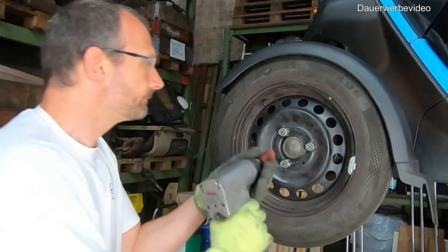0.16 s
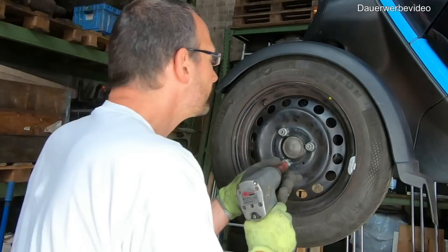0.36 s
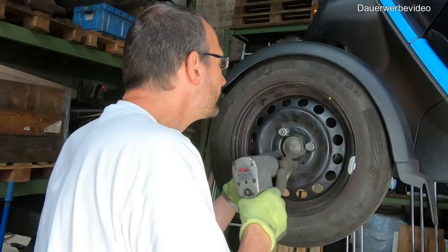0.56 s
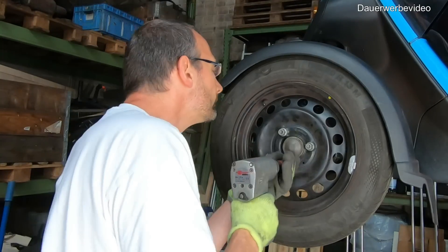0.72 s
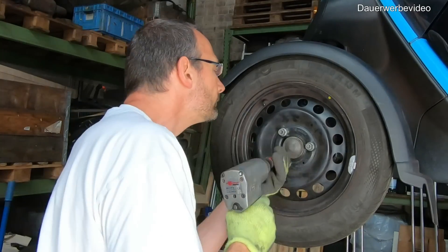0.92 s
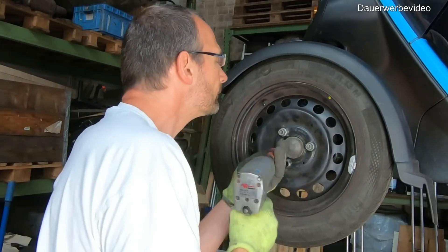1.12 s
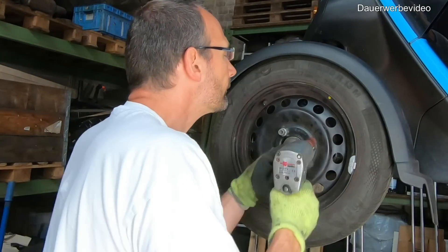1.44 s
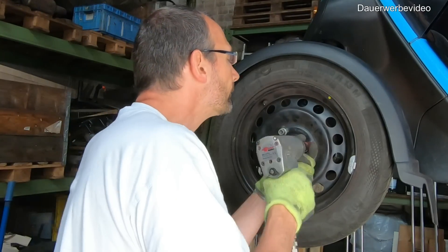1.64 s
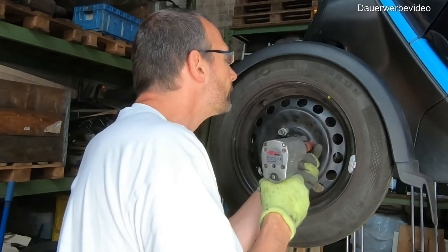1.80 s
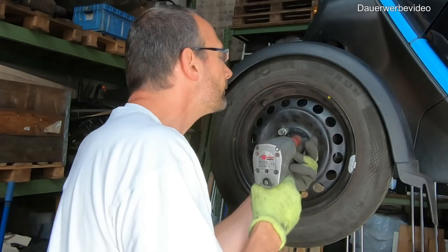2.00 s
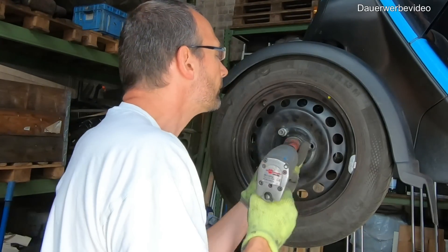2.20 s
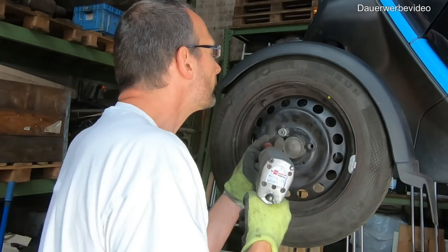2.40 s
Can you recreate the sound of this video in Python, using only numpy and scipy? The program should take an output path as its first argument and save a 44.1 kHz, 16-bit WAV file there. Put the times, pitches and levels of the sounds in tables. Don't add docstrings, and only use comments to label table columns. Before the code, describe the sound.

An impact wrench fires two short, clattering bursts on steel wheel bolts, each whining down afterward; socket knocks and small clicks come before each, close microphone, hard ringing garage.

```python
import sys
import numpy as np
from scipy import signal
from scipy.fft import rfft, irfft
from scipy.io import wavfile
from scipy.ndimage import uniform_filter1d

SR = 44100
rng = np.random.default_rng(int(sys.argv[2]) if len(sys.argv) > 2 else 0)


def log_audio(samples):
    frames = np.atleast_2d(samples).T
    limited = np.clip(frames, -1, 1)
    pcm = np.round(limited * 32767).astype(np.int16)
    wavfile.write(sys.argv[1], SR, pcm)


def level_to_linear(level):
    exponent = np.asarray(level, float) / 20
    return 10 ** exponent


N = 112454


def evened(x):
    return x / np.sqrt(np.mean(x ** 2) + 1e-20)


def add(mix, s, sound):
    part = mix[round(s * SR):][:len(sound)]
    part += sound[:len(part)]


def noise(points, count=N):
    f, db = np.transpose(points)
    hz = np.fft.rfftfreq(count, 1 / SR)
    gain = level_to_linear(np.interp(np.log(hz + 1), np.log(f), db))
    return evened(irfft(rfft(rng.standard_normal(count)) * gain, count))


def resonate(x, hz, width):
    return signal.lfilter(*signal.iirpeak(min(hz, .45 * SR), hz / width, SR), x)


def ring(modes, t, hz, focus_db):
    f, db, t60 = np.transpose(modes)[:, :, None]
    level_luck, tune_luck = rng.random((2, len(modes), 1))
    db = db - focus_db * abs(np.log2(f / hz)) + 8 * (level_luck - .5)
    tuned = f * (1 + 0.057 * (tune_luck - .5))
    return (level_to_linear(db - 60 * t / t60) * np.sin(2 * np.pi * tuned * t)).sum(0)


def thud(t, hz):
    u = 3.23 * hz * t
    return -np.sin(2 * np.pi * hz * t) * u * u * np.exp(2 - 2 * u)


def blow_load(t):
    load = 0
    for row in BLOWS:
        hold = np.clip((t - row[0]) / 0.00277, 0, 1)
        load = load + hold * np.exp(-np.maximum(t - row[0], 0) / .011)
    return load


TOP_HZ, STALL_HZ = 1213, 228.4
SAG_DB = -4
# (pull [s], rotor free [s], spin-up [s], release [s], coast [s], air [dB])
TRIGGER = [
    (0.68, 0.698, .1, .903, .0735, -21),
    (1.752, 1.799, .068, 1.924, .085, -26),
]
# (frequency [Hz], level [dB])
DRIVEN_TONE = [(230, -23.5), (420, -18), (700, -21), (900, -28), (1130, -39)]
# (frequency [Hz], level [dB])
COAST_TONE = [(110, -82), (190, -49.5), (300, -33.5), (400, -28), (490, -29), (620, -21), (820, -24.5),
              (1000, -32.5)]
DRIVEN_HARMONICS = [-39, -60, -44, -58, -52, -56, -60, -60, -60, -60]
COAST_HARMONICS = [-33, -37, -34.5, -37.5, -41, -39, -46, -42, -45, -50]
# (frequency [Hz], width [Hz], gain [dB])
HOUSING = [(2720, 170, 9.5), (1900, 2500, 0.5)]
# (frequency [Hz], level [dB per Hz])
EXHAUST = [(100, -2.5), (600, -19), (1500, -19), (4000, -5.5), (9000, -15.5), (16000, -9)]


def motor(pull, free, spin_s, release, coast_s, air_db):
    t = np.arange(N) / SR
    since, after = np.maximum(t - pull, 0), np.maximum(t - release, 0)
    coast = np.clip(after / 0.004, 0, 1)
    load = blow_load(t)
    gust = 3.5 * evened(uniform_filter1d(rng.standard_normal(N), 200))

    driven_hz = np.maximum(TOP_HZ * np.tanh((t - free) / spin_s) * (1 - .07 * load), STALL_HZ)
    idle_hz, release_hz = 80.2, 1007
    coast_hz = idle_hz + (release_hz - idle_hz) * np.exp(-(after / coast_s) ** 1.26)
    speed = driven_hz * (1 - coast) + coast * coast_hz
    wobble = 0.0126 + 0.3002 * np.exp(-since / 0.04116)
    jitter = evened(uniform_filter1d(rng.standard_normal(N), 150))
    turns = np.cumsum(speed * (1 + wobble * jitter)) / SR

    driven_level = level_to_linear(np.interp(speed, *np.transpose(DRIVEN_TONE)) + SAG_DB * load)
    coast_level = level_to_linear(np.interp(speed, *np.transpose(COAST_TONE)))
    tone = driven_level * (1 - coast) + coast_level * coast
    tone *= level_to_linear((1.15 - coast) * gust) * np.cos(2 * np.pi * turns)

    k = np.arange(len(COAST_HARMONICS))[:, None] + 2
    driven_fade = (1 - coast) * level_to_linear(SAG_DB * load) * (speed / TOP_HZ) ** 2
    coast_fade = coast * level_to_linear(-146 * after)
    sizes = np.outer(level_to_linear(DRIVEN_HARMONICS), driven_fade) + np.outer(level_to_linear(COAST_HARMONICS), coast_fade)
    flutter = evened(uniform_filter1d(rng.standard_normal(sizes.shape), 400))
    sizes *= level_to_linear((5.0 - 2.7 * coast) * flutter - 5.4 * coast * (k * speed > 3150))
    upper = (sizes * np.cos(2 * np.pi * k * turns + k * k)).sum(0)
    upper += sum(level_to_linear(gain) * resonate(upper, hz, width) for hz, width, gain in HOUSING)
    whine = 2 ** .5 * (tone + upper)

    raw = rng.standard_normal(N)
    chug = level_to_linear(-13.5 + gust - 60 * since / 0.32) * evened(resonate(resonate(raw, 385, 800), 385, 800))
    rush_db = 21.5 * np.exp(-since / 0.015) - 70 * since - 60 * after / 0.083
    air = level_to_linear(air_db - 3 + 4.0 * np.minimum(load, 1) + gust + rush_db) * noise(EXHAUST)
    return np.clip(since / 0.02, 0, 1) * (whine + chug + air)


# (frequency [Hz], level [dB], t60 [s])
ANVIL = [(3000, -8, 0.012), (5120, -19, 0.021), (6027, -10.5, 0.03), (8970, -5, 0.0074),
         (11100, -12.5, 0.036), (13150, -14, 0.0088), (15160, -19.5, 0.023)]
# (time [s], peak [dB], loudest ring [Hz], thump [dB])
BLOWS = [(0.6945, -6, 9300, -28), (0.701, 1, 11100, -7), (0.7242, 7.5, 9600, -11), (0.7418, 4, 9000, -10),
         (0.7548, 2, 7500, -5), (0.778, -10, 8800, -36), (0.7986, -1.5, 3220, -12.5),
         (0.8214, -3.5, 15000, -24), (0.844, -7.5, 8600, -49), (0.87, -12.5, 15500, -20.5),
         (0.9019, -11, 2930, -41), (1.7582, -1.5, 5840, -34.5), (1.7731, 8.5, 10400, -17),
         (1.7967, 6, 6900, -10), (1.8145, 2, 6900, -19), (1.8274, 2, 6550, -4), (1.8452, -4, 14900, -18.5),
         (1.8699, -6.5, 15500, -23), (1.8929, -9, 5150, -36), (1.9183, -10.5, 2900, -60)]


def blow(s, db, hz, thump_db):
    t = np.arange(0, .08, 1 / SR)
    burst = level_to_linear(-60 * np.maximum(t - .0025, 0) / 0.01)
    tail = level_to_linear(-35.0 - 60 * t / 0.086)
    raw = rng.standard_normal(len(t))
    grit = 0.31 * raw + 0.15 * np.diff(raw, prepend=0) + 0.25 * evened(resonate(raw, hz, 1700))
    crash = np.minimum(t / 0.0009, 1) * (burst + tail) * grit
    steel = level_to_linear(db - 5) * (crash + 1.46 * ring(ANVIL, t, hz, focus_db=9.5))
    return s + .001, steel + level_to_linear(thump_db - 9.5) * thud(t, 115.0)


# (time [s], level [dB])
KICKS = [
    (.6905, -11.5),
    (.712, -4),
    (1.769, -16),
    (1.785, 0),
]


def kick(s, db):
    return s, -level_to_linear(db) * thud(np.arange(0, .03, 1 / SR), 338)


# (frequency [Hz], level [dB], t60 [s])
RIM = [(841, -9.5, 0.049), (985, -5, 0.037), (1124, -3, 0.038), (1341, 0, 0.037), (1434, 0.5, 0.026),
       (1656, -13.5, 0.043), (2150, -10, 0.052), (2393, -10.5, 0.043), (2993, 0.5, 0.028),
       (3075, -6.5, 0.027), (3274, 1.5, 0.018), (4220, -4.5, 0.026), (5480, -6, 0.024), (6230, -5, 0.032),
       (9300, 2.5, 0.012)]
# (time [s], peak [dB], loudest ring [Hz], focus [dB per octave], rise [s])
KNOCKS = [(.385, 1, 3070, 4, 0.00053), (.406, -16, 3000, 14, 0.0018), (.421, -9.5, 1360, 19, .002),
          (.438, -3, 5000, 4.5, 0.00053), (.439, -15, 1350, 12, .001), (.499, -4.5, 1330, 6, 0.00078),
          (.508, -9, 1500, 5.5, 0.0017), (.520, -14, 1000, 3.5, .002), (.531, -12, 3100, 18, 0.0031),
          (.544, -20, 1400, -1, 0.0022), (.547, -12.5, 6230, 12.5, 0.0025), (.630, -1.5, 1450, 11, 0.0024),
          (1.412, -29.5, 1310, 2.5, 0.0015), (1.497, -38, 3530, -1, 0.0016), (1.6245, -5, 2260, 10, 0.0005),
          (1.6255, -10, 1020, 7, 0.00094), (1.634, -11, 950, 22, 0.0011), (1.647, -10, 850, 15.5, 0.0011),
          (1.714, -20, 850, 13, 0.0024), (1.720, -12.5, 900, 12, 0.0017)]


def knock(s, db, hz, focus_db, rise_s):
    t = np.arange(0, .25, 1 / SR)
    raw = rng.standard_normal(len(t))
    crack = 1.41 * evened(resonate(raw, hz, 0.99 * hz)) + 0.18 * np.diff(raw, prepend=0)
    crack *= level_to_linear(-60 * t / 0.028 - 1.35 * focus_db)
    tyre = level_to_linear(-18 - 0.55 * focus_db - 60 * t / 0.11) * evened(resonate(raw, 340, 190))
    return s, level_to_linear(db - 7.0) * np.minimum(t / rise_s, 1) * (ring(RIM, t, hz, focus_db) + crack + tyre)


# (time [s], peak [dB], centre [Hz])
TICKS = [(.028, -19.5, 2980), (.038, -19.5, 7400), (.051, -29, 5000), (.090, -16.5, 3200),
         (.143, -32, 3200), (.167, -21, 12200), (.378, -15, 3000), (.935, -17, 8840), (.945, -15, 9440),
         (.955, -18.5, 9100), (.996, -28.5, 14440), (1.007, -25.5, 7980), (1.185, -23.5, 12300),
         (1.315, -19.5, 7900), (1.567, -24.5, 9600), (1.568, -22.5, 1270), (1.581, -23, 5030),
         (1.589, -39, 4500), (1.977, -9, 5270), (2.02, -39.5, 12300), (2.31, -23.5, 7050)]


def tick(s, db, hz):
    t = np.arange(0, .06, 1 / SR)
    raw = rng.standard_normal(len(t))
    body = evened(resonate(raw, hz, 0.54 * hz)) + (hz / 9000) ** 2 * np.diff(raw, prepend=0)
    return s, level_to_linear(db - 6 - 60 * t / 0.015) * np.minimum(t / 0.00079, 1) * body


# (time [s], length [s], level [dB], centre [Hz])
RUBS = [(0.61, 0.18, -38, 126), (0.5, 0.056, -46, 100), (0.082, 0.034, -42, 14000),
        (.53, 0.051, -35.5, 275), (1.5, 0.44, -50, 208), (1.39, 0.047, -41, 6400),
        (1.408, 0.05, -46.5, 2300), (1.485, 0.03, -39.5, 3800), (1.695, 0.026, -38, 5200),
        (0.43, 0.054, -35.5, 3200), (2.1, 0.19, -43, 1620)]


def rub(s, length, db, hz):
    t = np.arange(0, length, 1 / SR)
    grain_db = 6.7 * np.minimum(rng.exponential(1, len(t)), 3)
    raw = rng.standard_normal(len(t)) * level_to_linear(grain_db)
    body = evened(resonate(raw, hz, 0.29 * hz)) + 0.99 * min(hz / 2500, 1) * evened(raw)
    return s, level_to_linear(db) * np.sin(np.pi * t / length) * evened(body)


# (frequency [Hz], level [dB per Hz])
PUFF = [(150, -39), (460, -9.5), (1300, -10.5), (7000, 1.5), (16000, -8.5)]


def puff():
    t = np.arange(16384) / SR
    pop = level_to_linear(1.5 - 60 * t / 0.018) * np.sin(2 * np.pi * 450 * t)
    fade = level_to_linear(-60 * t / 0.15) + level_to_linear(-21 - 60 * t / 2.0)
    return .217, level_to_linear(-20.5) * (fade * noise(PUFF, count=16384) + pop)


# (time back from the end [s], length [s], level [dB], pitch [Hz])
SQUEAK = (-0.8, 0.3, -43, 1028)


def squeak():
    s, length, db, hz = SQUEAK
    t = np.arange(0, length, 1 / SR)
    return s, level_to_linear(db) * np.sin(np.pi * t / length) * evened(resonate(rng.standard_normal(len(t)), hz, 41))


# (frequency [Hz], level [dB])
ECHO_COLOUR = [(100, 4.5), (700, 1), (1600, -0.5), (2950, -1.5), (3300, -5), (6300, -5), (8000, -10),
               (16000, -1)]
# (frequency [Hz], t60 [s])
ROOM = [(100, 0.143), (1000, 0.65), (2500, 1.62), (6000, 1.29), (14000, 0.8)]


def room(x):
    hz, t, z = signal.stft(noise(ECHO_COLOUR, count=SR), SR, nperseg=256)
    f, t60 = np.transpose(ROOM)
    band_t60 = np.interp(np.log(hz + 1), np.log(f), t60)[:, None]
    tail = signal.istft(z * level_to_linear(-60 * t / band_t60), SR, nperseg=256)[1]
    tail *= np.minimum(np.arange(len(tail)) / SR / 0.0071, 1)
    return signal.fftconvolve(x, tail / np.linalg.norm(tail))[:N]


# (frequency [Hz], level [dB per Hz])
HISS = [(20, -10), (60, -19), (220, -14), (900, -8.5), (2500, -8), (6200, -12.5), (16000, -21.5)]
# (time [s], hiss [dB], rumble [dB])
GARAGE = [(0, -48, -37), (.3, -42.5, -40), (.66, -73, -36.5), (0.752, -72, -27), (.9, -39, -49.5),
          (1., -39, -87), (1.45, -56, -57.5), (1.699, -44.5, -48), (1.8, -70.5, -27.5),
          (1.95, -42.5, -78.5), (2.55, -55, -58)]


def background():
    t = np.arange(N) / SR
    s, hiss_db, rumble_db = np.transpose(GARAGE)
    rumble = noise([(20, 3.0), (40, -18), (54, -5.5), (75, -13), (200, -19.0), (1000, -38)])
    rumble += level_to_linear(-2.5) * np.sin(2 * np.pi * 54.24 * t + 1.33 * np.sin(2 * np.pi * 2.3 * t))
    return level_to_linear(np.interp(t, s, hiss_db)) * noise(HISS) + level_to_linear(np.interp(t, s, rumble_db)) * rumble


def scene():
    near = sum(motor(*row) for row in TRIGGER)
    for rows, source in ((BLOWS, blow), (KICKS, kick), (KNOCKS, knock), (TICKS, tick), (RUBS, rub)):
        for row in rows:
            add(near, *source(*row))
    add(near, *puff())
    add(near, *squeak())
    mid = near + level_to_linear(-14) * room(near) + background()
    loudness = np.clip(uniform_filter1d(abs(mid), 900) / 0.089, .1, 1)
    side = level_to_linear(-28) * np.roll(mid - 0.43 * np.roll(mid, 2), 40) * loudness
    side += level_to_linear(-27) * np.roll(uniform_filter1d(mid, 30), 250)
    return np.array([mid + side, mid - side])


def roll_off(x):
    return signal.sosfilt(signal.butter(12, 16510, fs=SR, output="sos"), x)


def record(dry):
    overloaded = 1.283 * np.tanh(dry / 1.245)
    mix = signal.oaconvolve(overloaded, signal.firwin(255, 16050, fs=SR)[None], "same")
    return roll_off(mix)


dry = scene()
out = record(dry)
log_audio(out)
```